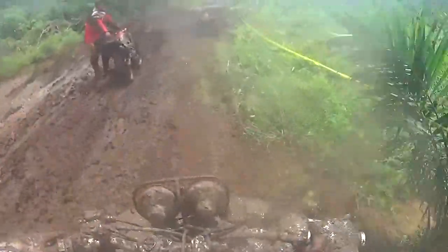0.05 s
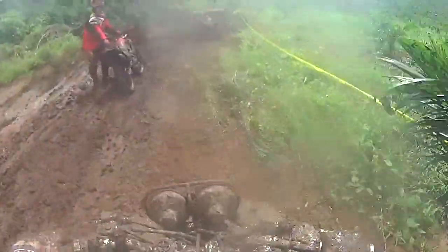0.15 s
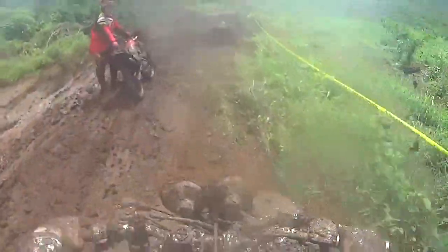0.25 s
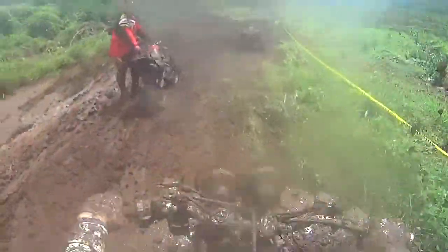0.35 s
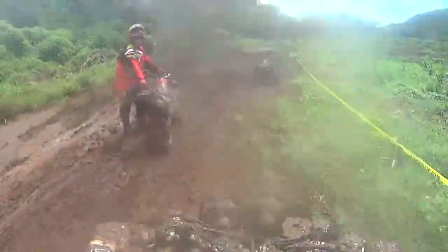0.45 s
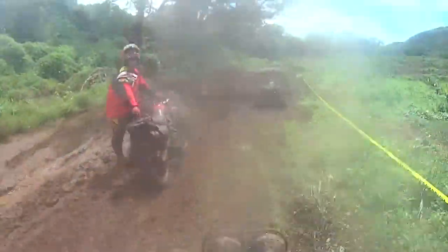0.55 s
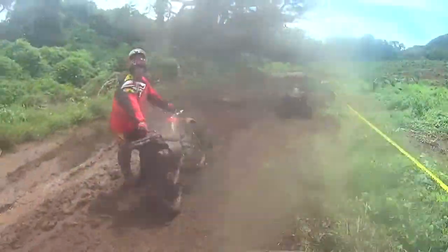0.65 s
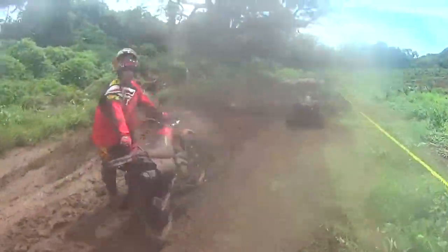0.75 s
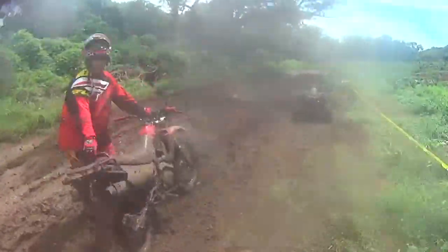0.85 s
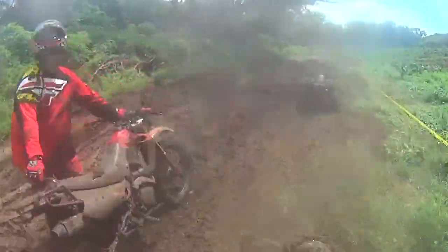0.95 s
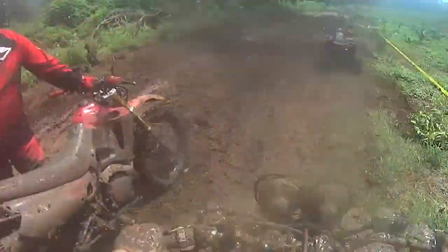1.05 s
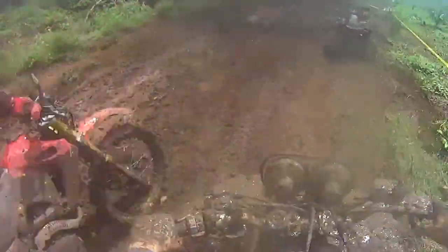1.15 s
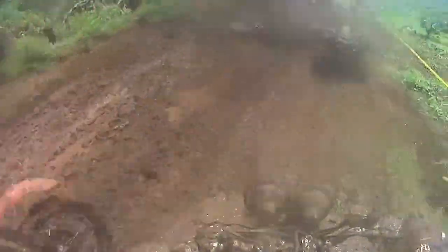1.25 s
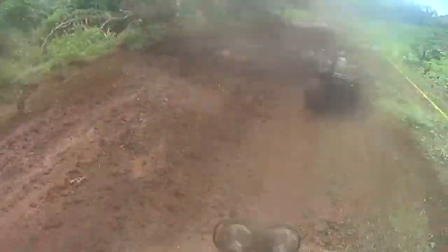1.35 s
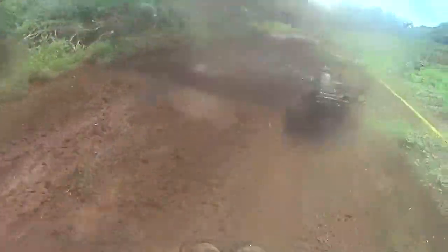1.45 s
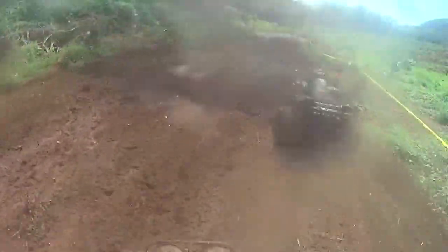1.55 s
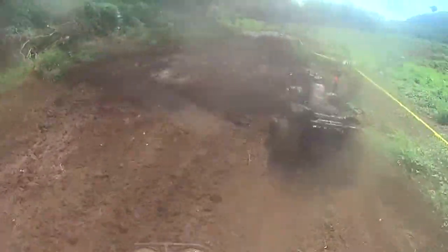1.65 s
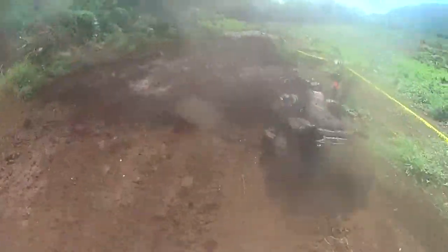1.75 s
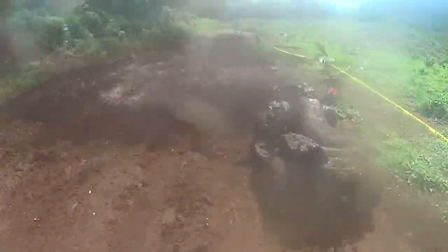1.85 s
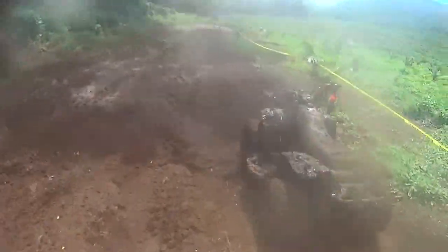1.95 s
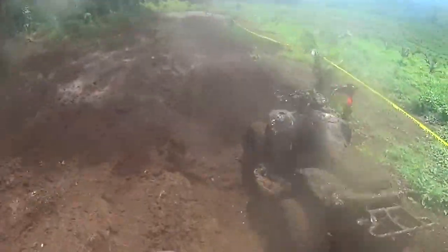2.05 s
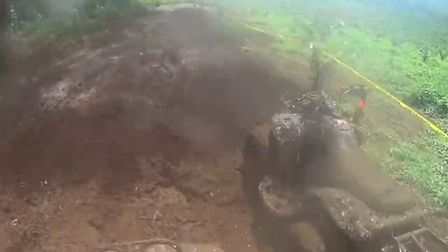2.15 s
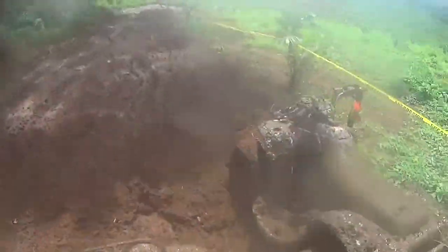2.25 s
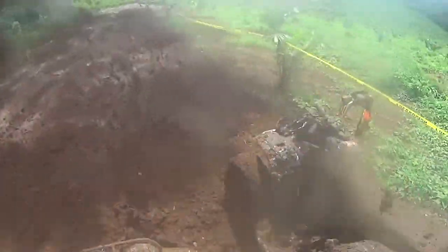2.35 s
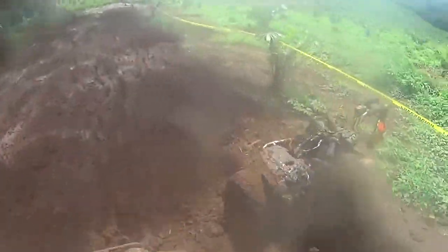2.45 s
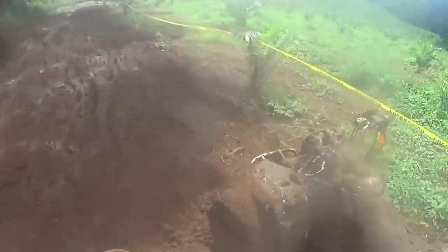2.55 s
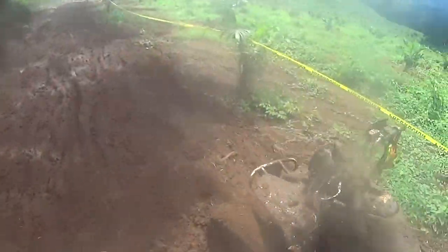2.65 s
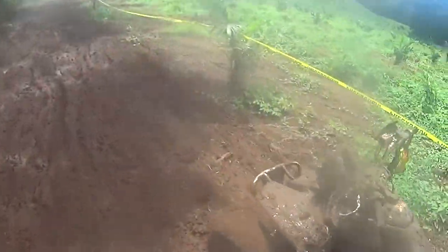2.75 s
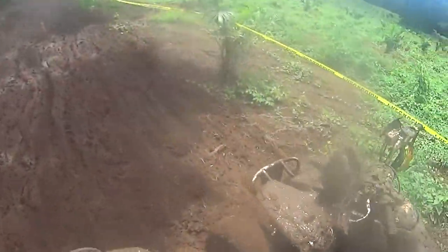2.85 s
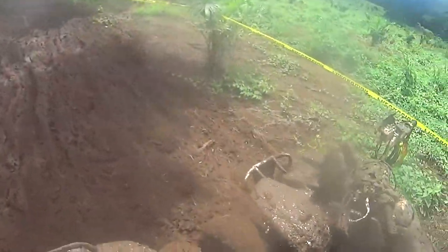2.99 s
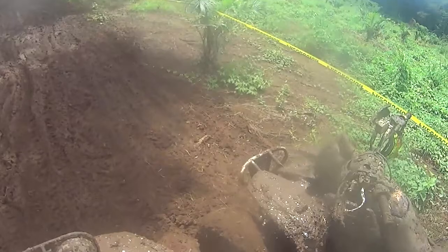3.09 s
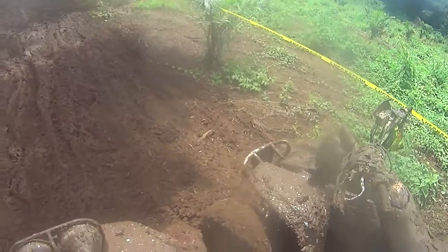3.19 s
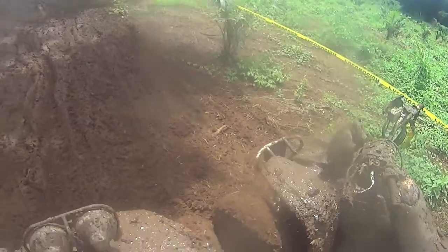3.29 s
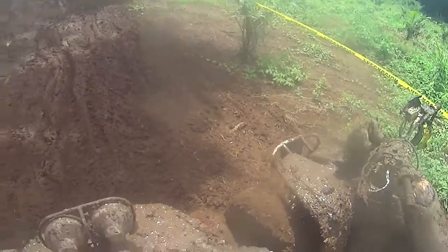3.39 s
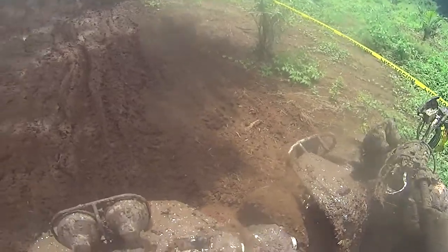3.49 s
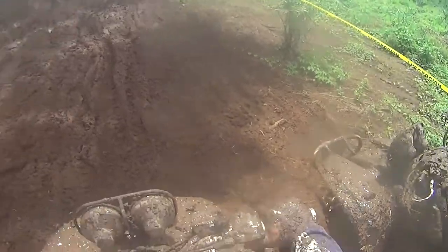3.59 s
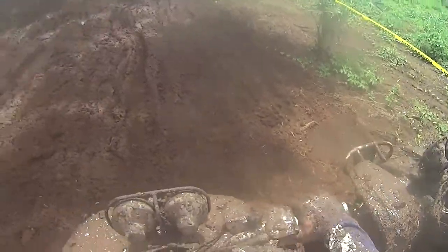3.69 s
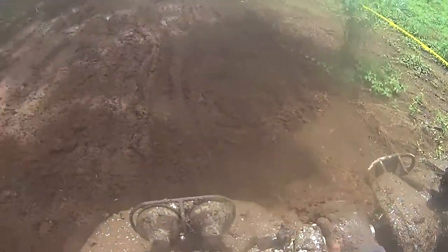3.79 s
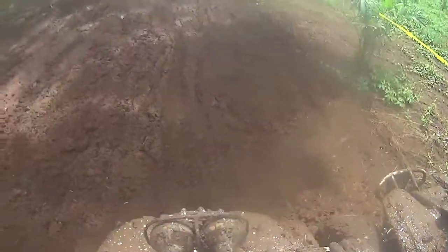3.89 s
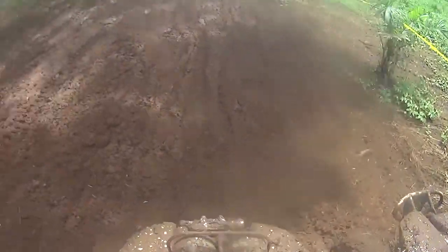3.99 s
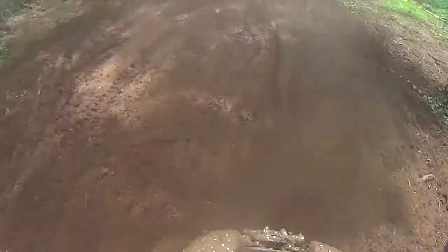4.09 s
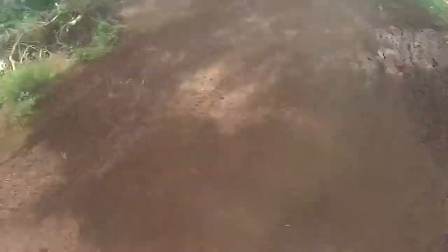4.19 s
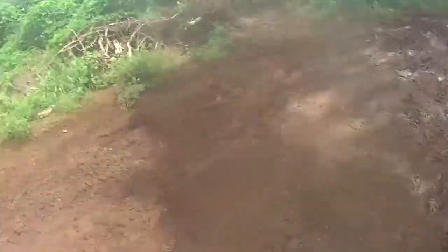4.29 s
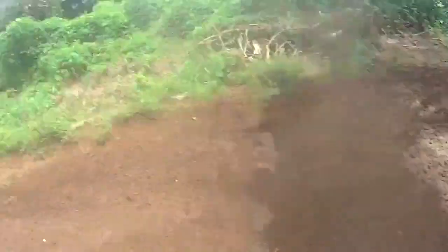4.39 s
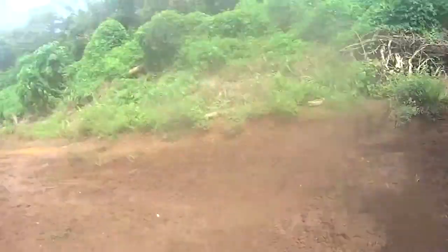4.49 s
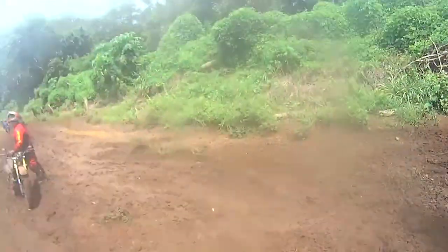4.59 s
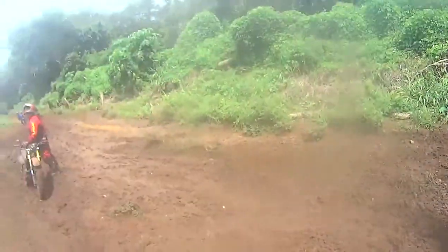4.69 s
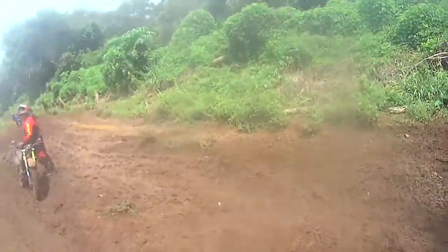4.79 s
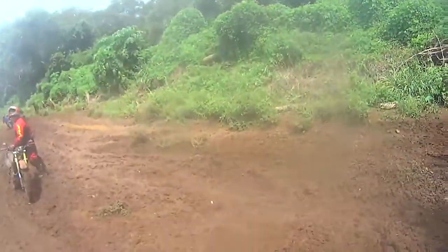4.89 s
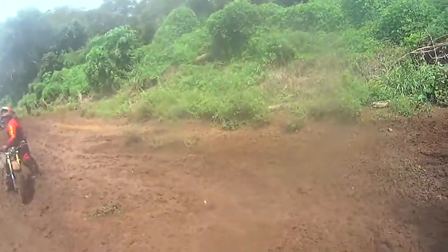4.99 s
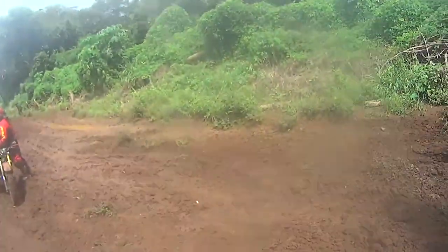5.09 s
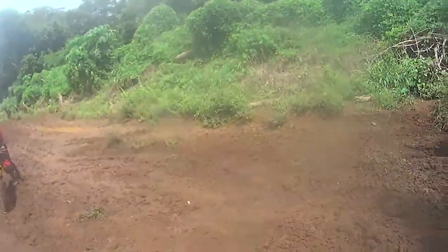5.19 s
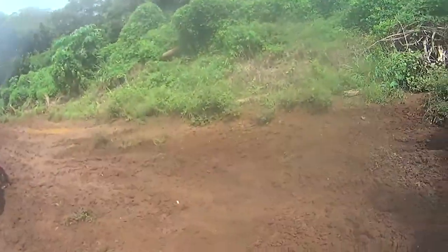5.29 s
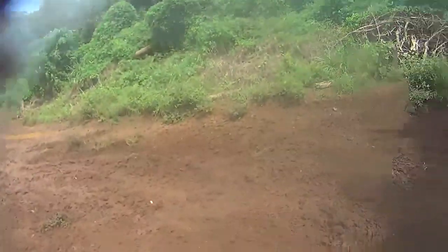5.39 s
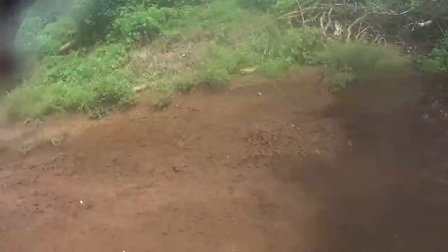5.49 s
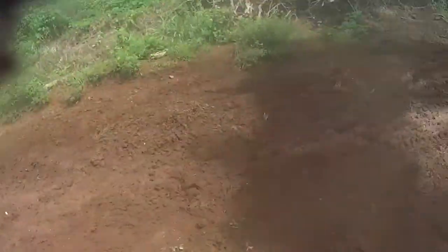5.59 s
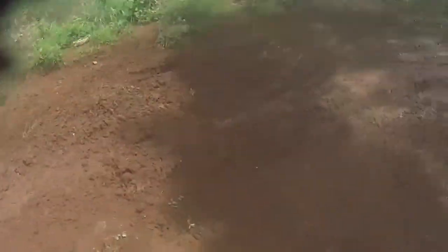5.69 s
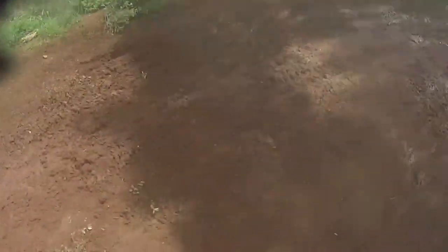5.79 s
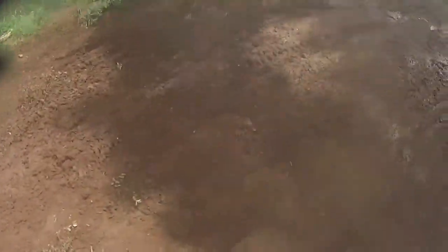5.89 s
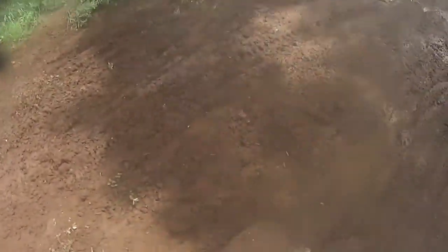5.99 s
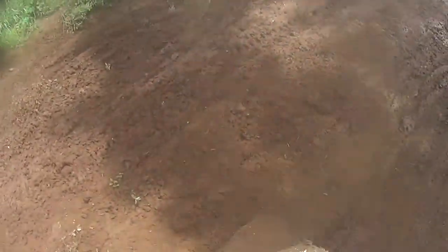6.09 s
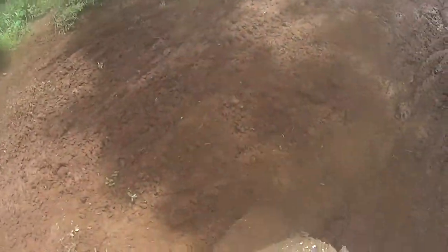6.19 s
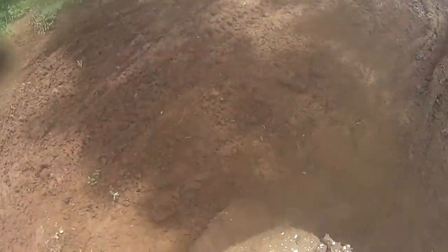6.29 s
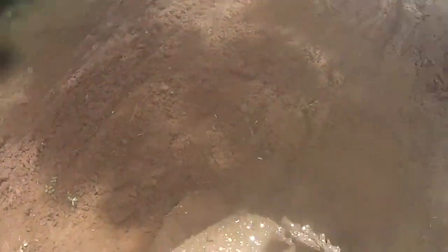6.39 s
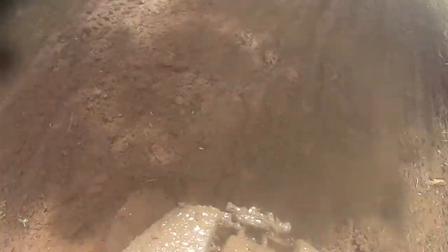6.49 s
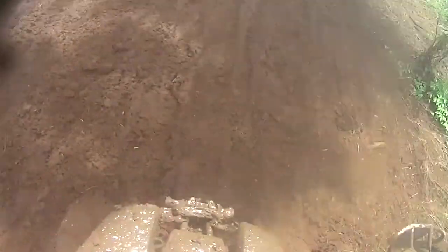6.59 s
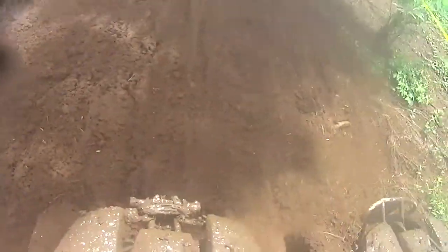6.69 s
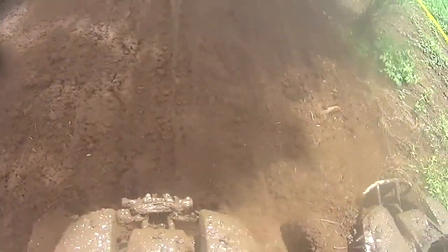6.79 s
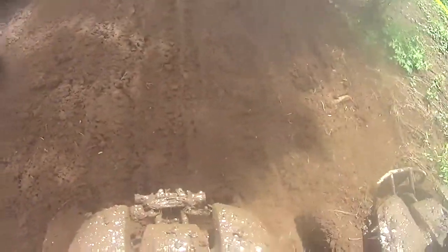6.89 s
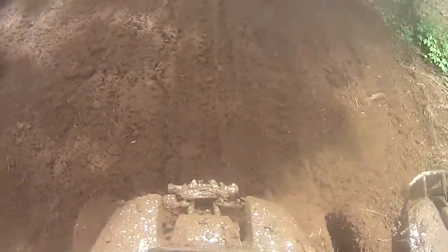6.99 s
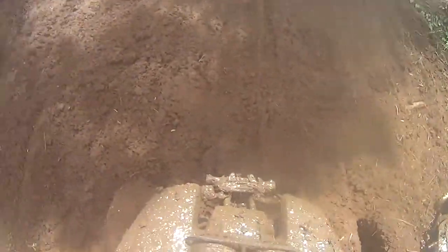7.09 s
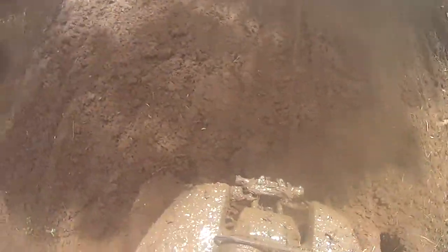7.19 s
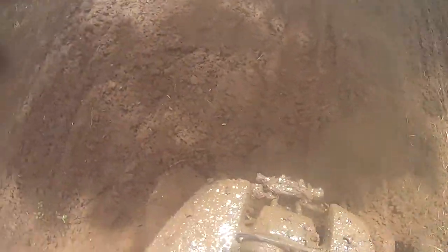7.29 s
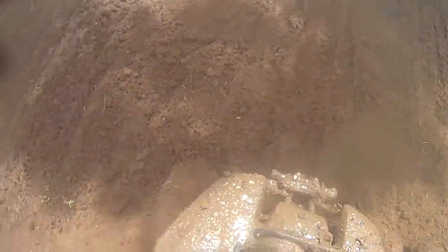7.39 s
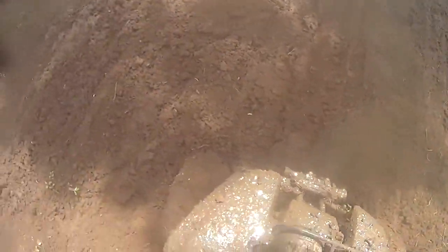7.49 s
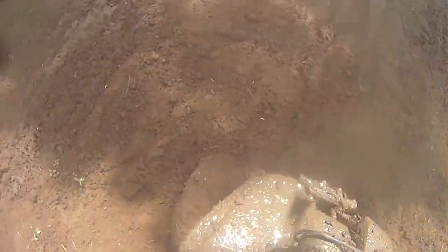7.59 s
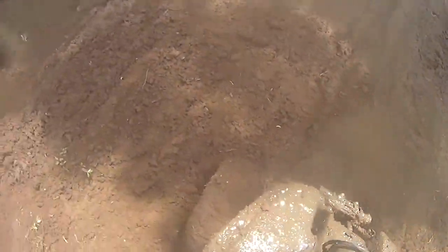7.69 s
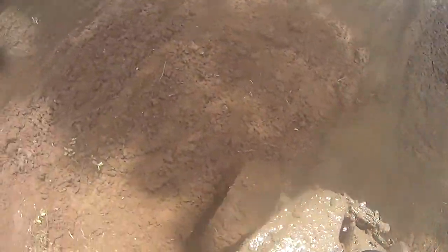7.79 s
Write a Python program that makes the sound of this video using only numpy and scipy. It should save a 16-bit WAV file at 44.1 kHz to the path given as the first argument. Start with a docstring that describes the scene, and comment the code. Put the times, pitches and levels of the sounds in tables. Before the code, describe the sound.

Close onboard single-cylinder quad engine: rough, blipping roar falling away into slow, hollow chugs and mechanical clatter, with bumps, before the engine dies.

```python
"""A single-cylinder four-stroke quad pulls hard up a muddy trail, heard from a camera in a plastic case on the rider.
Firing pulses boom, bark through pipe resonances and ring the case; air pulses and turbulence take over off throttle.
The throttle shuts, the speed runs down to a chugging idle, and the engine finally dies.
Whistle, chain, whine and panel are breathy tones or narrow noise; bumps ring the camera mount, mud clicks on the case.
A quiet bed of filtered outdoor noise and hiss lies underneath."""
import sys
import numpy as np
from scipy import signal
from scipy.fft import rfft, irfft
from scipy.io import wavfile
from scipy.ndimage import uniform_filter1d, minimum_filter1d

SR = 44100
rng = np.random.default_rng(int(sys.argv[2]) if len(sys.argv) > 2 else 0)


def wrap_up_sound(samples):
    """Save the sound to the file named by the first command line argument, as 16-bit audio."""
    columns = np.atleast_2d(samples).T
    # keep every value between -1 and 1, then stretch to whole-number steps
    tamed = np.clip(columns, -1, 1)
    steps = np.round(tamed * 32767).astype(np.int16)
    wavfile.write(sys.argv[1], SR, steps)


N = 346185
T = np.arange(N) / SR  # time in s

# idle firing once it catches: t/s, strength (0-1), extra pipe level/dB
IDLE_BURN = [(2.45, 0.19, -3.5), (3.15, 0.88, 3), (3.9, 0.79, 5), (4.5, 0.76, 1), (5.8, 0.84, -2.2),
             (7.3, 0.93, -7)]
# rider's head turning from and to the engine: t/s, level/dB before each layer takes its share
HEAD_TURN = [(0, 0.5), (2.2, 0), (3.1, -0.9), (3.8, 1.16), (4.4, -1), (5, -2.5), (5.9, 0), (6.9, 1),
             (7.85, -0.5)]
# layer mix laws: coasting level at idle speed/dB, rise per doubling of speed/dB,
# boost by idle firing/dB, by a cracked throttle/dB, by a full stab/dB, share of the head turn (factor)
BOOM_LAW = (-44.5, 1.85, 3, 3.5, -4, -0.1)
AIRBOX_LAW = (-51, 3.5, 14, 6.5, 4, 0.8)
PIPE_LAW = (-56.5, 8, 4, 3, 12.5, 0.6)
CASE_LAW = (-40.5, 6.5, -0.5, 7, 6.5, 1)
HISS_LAW = (-57, 7.5, 0.5, 4, 5, 1.1)
LET_GO_S, LET_GO_FADE_S = 1.264, 0.2  # the throttle stays cracked open until it is let go
BURN_OUT_S = 0.053  # fade of the idle firing at the stall
IDLE_UNEVEN_DB = 1.34  # spread of the chugs at full idle firing


def engine():
    """Under load each firing barks; off throttle the pumping of the cylinder and the valve gear are left."""
    rate_hz = firing_rate()
    stab, _, intake_db = thumb()
    cracked = 1 - ramp(LET_GO_S - LET_GO_FADE_S / 2, LET_GO_FADE_S)
    throttle = 0.34 * cracked + 0.56 * stab
    load = np.clip(1.84 * throttle - 0.5, 0, 1)
    burn, bark_db = np.array(curves(IDLE_BURN)) * (1 - ramp(STALL_S, BURN_OUT_S))
    uneven_db = IDLE_UNEVEN_DB * burn * murmur(IDLE_HZ)

    # the same controls ride the level of every layer
    doublings = np.log2(rate_hz / IDLE_HZ)
    controls = np.array([np.ones(N), doublings, burn, cracked, stab, curves(HEAD_TURN)[0]])
    laws = np.array([BOOM_LAW, AIRBOX_LAW, PIPE_LAW, CASE_LAW, HISS_LAW])
    boom_db, airbox_db, pipe_db, case_db, hiss_db = laws @ controls

    turn = np.cumsum(rate_hz) / SR + 0.5  # engine cycles so far
    strength = 0.25 + load  # a shut throttle leaves only weak firings
    firing = pulses(turn, 0.02, scatter_db=1, jitter_s=0.00007) * strength
    suck, slam = valve_strokes(turn)
    tappets = tappet_ticks(turn)
    # overrun air flow is turbulent; it calms as the speed sinks
    rough = np.clip((rate_hz - 15) / 30, 0.11, 0.35) * (1 - 0.85 * load)

    layers = [
        (low_boom(suck, firing, load, rough), boom_db),
        (airbox(slam, firing, load, rough), airbox_db + intake_db + uneven_db),
        (exhaust_pipe(turn, firing, throttle), pipe_db + bark_db + uneven_db),
        (case_rattle(turn, strength, tappets, throttle), case_db),
    ]
    body = sum(steady(layer) * undb(db) for layer, db in layers)
    return ports(body) + undb(hiss_db) * gas_hiss(tappets, firing, throttle)


# engine speed on the climb: t/s, f/Hz (firings per second)
CLIMB = [(0, 75), (.3, 64.1), (.4, 60.1), (.52, 52.25), (.65, 57), (.72, 55.8), (.8, 60.8), (.9, 53.6),
         (1.02, 54.6), (1.1, 47.5), (1.2, 42), (1.35, 38.5), (1.466, 39.307)]
# then the flywheel runs down to idle; a shape over 1 makes it hang a little at first
IDLE_HZ, RUN_DOWN_S, RUN_DOWN_SHAPE = 15.79, 1.3526, 1.2321
HUNT_FROM_S, HUNT_HZ, HUNT_PERIOD_S = 3.38, 0.19, 1.48  # slow swing of the speed near idle
STALL_S, STALL_HZ_PER_S = 7.38, 21  # the firing stops and friction brakes the crank


def firing_rate():
    """Cycles per second: the climb, the flywheel's run-down to a hunting idle, the friction-braked stall."""
    running_down = np.maximum(T - CLIMB[-1][0], 0) / RUN_DOWN_S
    hz = IDLE_HZ + (curves(CLIMB)[0] - IDLE_HZ) * np.exp(-running_down ** RUN_DOWN_SHAPE)
    hunt = HUNT_HZ * np.cos(2 * np.pi * (T - HUNT_FROM_S) / HUNT_PERIOD_S) * (T > HUNT_FROM_S)
    return hz - hunt - STALL_HZ_PER_S * np.maximum(T - STALL_S, 0)


# throttle stabs: opens t/s, closes t/s, stab at first (0-1), stab at last (0-1), airbox level/dB
STABS = [(0, .08, 0.7, 0.54, -2), (0.135, 0.272, 0.66, 0.67, -6), (0.287, 0.343, 0.64, .76, 2),
         (0.352, 0.466, 0.9, 0.96, 1.5), (0.523, 0.753, 0.88, 0.79, 0), (0.756, 0.862, .95, 0.93, 2.5),
         (0.942, 1.054, 0.6, 0.78, 0)]
THUMB_S = 0.016  # time to open or close
GASP_PEAK_S, GASP_AIRBOX_DB = 0.077, 6.5  # delay after closing, airbox lift at a full gasp


def thumb():
    """Stabs of the throttle, the intake's gasp against the closing plate, and the extra airbox level in dB."""
    stab, gasp, airbox_db = np.zeros((3, N))
    for opens_s, closes_s, first, last, db in STABS:
        held = ramp(opens_s - THUMB_S / 2, THUMB_S) - ramp(closes_s - THUMB_S / 2, THUMB_S)
        stab += held * np.interp(T, [opens_s, closes_s], [first, last])
        airbox_db += held * db
        age = np.maximum(T - closes_s, 0) / GASP_PEAK_S
        earlier = gasp * (1 - ramp(opens_s, THUMB_S))  # a new stab cuts the old gasp
        gasp = earlier + (age * np.exp(1 - age)) ** 2
    return stab, gasp, airbox_db + GASP_AIRBOX_DB * gasp


# air pulses of one cycle: position (share of the cycle), strength into boom (signed), into airbox (signed)
STROKES = [(-.075, -0.83, -0.52), (.06, -0.13, 0.46), (.18, 0.24, 0.46), (.31, -0.32, -0.038)]


def valve_strokes(turn):
    """Valves opening and shutting push air pulses, nearly alike in every cycle, into boom and airbox."""
    suck, slam = np.zeros((2, N))
    for share, low, box in STROKES:
        stroke = pulses(turn, share, scatter_db=1.2, jitter_s=0.00008)
        suck += stroke * low
        slam += stroke * box
    return suck, slam


def tappet_ticks(turn):
    """Tappets tick twice a cycle, the second time more softly."""
    first = pulses(turn, 0.22, scatter_db=2.5, jitter_s=0.001)
    second = pulses(turn, 0.62, scatter_db=3, jitter_s=0.002)
    return first + 0.3 * second


# low resonances: f/Hz, width/Hz, relative level/dB
BOOM = [(67.3, 11.8, 7.5), (109, 300, -4)]


def low_boom(suck, firing, load, rough):
    """Valve strokes, or firings under load, excite the low resonances along with turbulent air."""
    return blend(ring(blend(suck, firing, load), BOOM), ring(noise(), BOOM), rough)


# airbox resonances: f/Hz, width/Hz, relative level/dB
AIRBOX = [(251, 44, 4), (306, 38.3, 7), (333.2, 34.8, 3)]
# muffler resonances: f/Hz, width/Hz, relative level/dB
MUFFLER = [(245, 53, 3.1), (293, 106, 3.3), (320.3, 29, 7.5)]


def airbox(slam, firing, load, rough):
    """Valve strokes ring the airbox; under load the firings ring the muffler instead; turbulence joins in."""
    ringing = blend(ring(slam, AIRBOX), ring(firing, MUFFLER), load)
    return blend(ringing, ring(noise(), AIRBOX), rough)


# pipe resonances on the throttle: f/Hz, width/Hz, relative level/dB
PIPE = [(539, 65, 3), (657, 31, 1.5), (802, 57, 4.5), (890, 79, -4.5)]
# pipe resonances at idle: f/Hz, width/Hz, relative level/dB
IDLE_PIPE = [(476, 186, -5), (540.6, 41, 7.5), (819, 17, -7), (876, 67, -33)]


def exhaust_pipe(turn, firing, throttle):
    """Idle puffs and their turbulence ring the pipe; on the throttle the firings ring it at other pitches."""
    puff = pulses(turn, 0.1193, scatter_db=3, jitter_s=0.0001)
    breathy_puff = blend(puff, gush(puff, 0.008), 0.5)
    idle = ring(blend(breathy_puff, noise(), 0.22), IDLE_PIPE)
    loud = blend(ring(firing, PIPE), ring(gush(firing, 0.008), PIPE), 0.06)
    return blend(idle, loud, 1.4 * throttle)


# case tone on the throttle: f/Hz, relative level/dB
CASE_LOUD = [(560, -36), (950, -34), (991, -32), (1280, -1.5), (1370, -4.5), (1520, 5), (1660, 11),
             (1780, 3), (2030, -13.5), (2170, -47), (2600, -35), (3380, -106), (5720, -120)]
# case tone off the throttle: f/Hz, relative level/dB
CASE_SOFT = [(410, -43.5), (700, -17.5), (816, -11), (926, -13), (989, -24), (1080, -14), (1190, -13),
             (1290, -2.5), (1450, -0.5), (1580, 3.5), (1680, 1), (1910, -14.5), (2430, -30), (2600, -29),
             (3380, -94.5), (5720, -120)]


def case_rattle(turn, strength, tappets, throttle):
    """Valve-gear clatter colours the plastic case; on the throttle the sharp blast fronts ring it."""
    # tappets over the rustle of chain and gears
    clatter = blend(noise(), gush(tappets, 0.011), 0.4)
    # the front of each blast wanders a little, so its high partials smear
    crack = pulses(turn, 0.02, scatter_db=1, jitter_s=0.0002) * strength
    bark = blend(crack, gush(crack, 0.005), 0.3)
    return blend(colour(clatter, CASE_SOFT), colour(bark, CASE_LOUD), 1.036 * throttle)


# hiss tone on the throttle: f/Hz, relative level/dB
HISS_LOUD = [(1290, -3), (2200, 4), (2780, 0.5), (3360, 4), (3670, -8), (3900, -9), (4460, -5.5),
             (4970, -19), (5460, -10), (6730, -15), (7650, -28), (10200, -32), (11000, -43), (14300, -75),
             (22000, -120)]
# hiss tone off the throttle: f/Hz, relative level/dB
HISS_SOFT = [(1300, -40.5), (2200, 2), (2500, -5), (3200, 4), (3600, -2), (3800, -8), (4150, -3.5),
             (4450, -6), (5000, 0.5), (5800, -7), (6600, -17), (7350, -8.5), (8100, -15), (9000, -13),
             (10000, -23.5), (11000, -35.5)]
# width of the hiss: f/Hz, side minus mid level/dB
HISS_WIDTH = [(1500, -3), (2700, 6), (3300, -4), (4000, 4), (5000, -11), (5800, 0.5), (7400, -0.5),
              (11000, 0)]


def gas_hiss(tappets, firing, throttle):
    """Gas and chain turbulence flares at tappets or firings and reaches each port differently."""
    def draw():
        soft = blend(noise(), gush(tappets, 0.0036), 0.21)
        loud = blend(noise(), gush(firing, 0.0047), 0.49)
        return blend(colour(soft, HISS_SOFT), colour(loud, HISS_LOUD), throttle)

    mid, side = draw(), draw()
    return mid + colour(side, HISS_WIDTH) * np.array([[1], [-1]])


def throttle_whistle():
    """Air whistles past the closing throttle plate with each gasp."""
    _, gasp, _ = thumb()
    return gasp * tone(4890, -39.5, width_hz=190)


CHAIN_HZ, CHAIN_DB, CHAIN_DB_PER_DOUBLING = 4955, -61.5, 7  # level at idle speed and its rise
CHAIN_FACING = 5.8  # share of the head turn


def chain_ring():
    """The timing chain rings louder with speed, and mostly when the head faces the engine."""
    speed_db = CHAIN_DB_PER_DOUBLING * np.log2(firing_rate() / IDLE_HZ)
    db = CHAIN_DB + speed_db + CHAIN_FACING * curves(HEAD_TURN)[0]
    return tone(CHAIN_HZ, db, width_hz=320)


# faint whine while coasting: t/s, f/Hz, level/dB
WHINE = [(4.25, 1105, -49), (4.598, 1106, -53.5), (5, 1070, -56), (5.298, 1098, -58.5), (5.698, 1116, -49)]


def coasting_whine():
    """A thin breathy tone drifts in pitch and level, fading in and out at its ends."""
    fade = np.clip(np.minimum(T - WHINE[0][0], WHINE[-1][0] - T) * 10, 0, 1)
    return fade * tone(*curves(WHINE), width_hz=42)


SING_HZ, SING_WIDTH_HZ, SING_DB = 1563, 81, -39
SING_FULL_S, SING_RISE_DB_PER_S, SING_FALL_DB_PER_S = 6.55, 7, 28


def panel_sing():
    """A panel resonance in noise builds up at idle, holds, and fades as the engine dies."""
    rise_db = SING_RISE_DB_PER_S * np.maximum(SING_FULL_S - T, 0)
    fall_db = SING_FALL_DB_PER_S * np.maximum(T - STALL_S, 0)
    once = band(noise(), SING_HZ, SING_WIDTH_HZ)
    return steady(band(once, SING_HZ, SING_WIDTH_HZ)) * undb(SING_DB - rise_db - fall_db)


# trail bumps on the camera mount: t/s, level/dB, pitch (factor), contact time/s
BUMPS = [(1.591, -16, 0.87, 0.0018), (1.599, -11, 1.07, 0.0024), (1.616, -25, 1.01, 0.0012),
         (1.999, -21.5, 0.99, 0.0024), (2.715, -37, 0.67, 0.0053), (2.816, -21.5, 0.97, 0.0081),
         (4.757, -30.5, 0.93, 0.0043), (6.627, -19.5, 1.036, 0.0014), (6.632, -22.5, 0.74, 0.0037),
         (6.643, -21, 1.1, 0.0015), (6.66, -19, 0.96, 0.0034)]
# mount ring modes: f/Hz before the pitch factor, relative level/dB, t60/s
MOUNT = [(62.4, -14, 0.08), (115.5, 2.5, 0.26), (246.5, 3, 0.11), (295, -7.5, 0.15), (490, -6.5, 0.14)]
ROCK_DB, ROCK_LAG_S = -10.5, 0.0022  # sideways rocking, a little later


def bumps():
    """Soft blows set the decaying modes of the camera mount ringing and rock it sideways."""
    out, t = np.zeros(N), T[:SR // 2]
    for s, db, pitch, contact_s in BUMPS:
        modes = np.zeros(len(t))
        for hz, mode_db, t60 in MOUNT:
            modes += undb(mode_db) * np.cos(2 * np.pi * hz * pitch * t) * undb(-60 * t / t60)
        push = np.hanning(int(contact_s * SR) + 3)  # longer contact, duller thud
        thud = np.convolve(modes, push / push.sum())[:len(t)]
        i = int(s * SR)
        out[i:i + len(t)] -= undb(db) * thud
    rock = undb(ROCK_DB) * np.interp(T - ROCK_LAG_S, T, out, left=0)
    return ports(out) + rock * np.array([[1], [-1]])


# mud clicks on the case: t/s, level/dB, centre f/Hz, treble level/dB relative to the note, decay/s
CLICKS = [(.126, -16, 1630, -6.5, 0.0016), (.269, -18.5, 1550, -5, 0.00064),
          (0.5564, -4, 1531, -5.5, 0.00088), (1.164, -12.5, 795, -33, 0.0019),
          (1.585, -15.5, 1390, -23, 0.0052), (1.593, -12.5, 890, -22, 0.001),
          (1.597, -14, 1440, -30, 0.0051), (1.601, -12, 640, -15, 0.0025), (1.604, -9, 1420, -12.5, 0.0023),
          (1.61, -19, 1380, -28, 0.0022), (1.868, -8, 1550, -25, 0.0027), (2.077, -24.5, 692, -14, 0.0058),
          (2.24, -12.5, 1700, -20, 0.0027), (4.756, -15, 1530, -40, 0.0037),
          (4.757, -12.5, 910, -40, 0.0026), (4.758, -29, 347, -30, 0.03), (4.774, -22.5, 960, -26, 0.0037),
          (4.95, -31.5, 1002, -26, 0.006), (6.628, -21, 1310, -38, 0.0005), (6.644, -23, 840, -26, 0.0067)]


def clicks():
    """Bits of mud give short gritty hits on the plastic, each with its own note and a bright crack."""
    out, t = np.zeros(N), T[:SR // 10]
    for s, db, hz, treble_db, decay_s in CLICKS:
        grit = rng.standard_normal(len(t)) * np.exp(-t / decay_s)
        note = band(band(grit, hz, hz * 0.4), hz, hz * 0.6)
        # harder contact, higher crack
        crack_hz = 2900 * 2 ** (np.clip(treble_db + 18, -14, 18) / 18)
        crack = band(band(grit, crack_hz, crack_hz * 0.36), crack_hz, crack_hz)
        hit = note / np.abs(note).max() + undb(treble_db) * crack / np.abs(crack).max()
        i = int(s * SR)
        out[i:i + len(t)] += undb(db) * hit
    return ports(out, lag_s=0.000384)


# tone of the outdoor bed: f/Hz, relative level/dB
TRAIL = [(25, -36.5), (80, -12.5), (270, 10.5), (400, 7.5), (700, -18.5), (1000, -44), (1550, -43),
         (2300, -24.5), (5000, -16.5), (11000, -27)]
TRAIL_DB, HISS_DB = -51, -58


def trail():
    """A quiet bed: coloured outdoor noise with a softer side part, and white hiss at each port."""
    mid, side = (steady(colour(noise(), TRAIL)) for _ in range(2))
    outdoors = mid + 0.5 * side * np.array([[1], [-1]])
    return undb(TRAIL_DB) * outdoors + undb(HISS_DB) * np.array([noise(), noise()])


# width of the sound at the two ports: f/Hz, side minus mid level/dB
WIDTH = [(60, -13), (120, -26.5), (190, -20), (265, -4), (340, -2.5), (520, 3), (820, -8), (1020, 5),
         (1280, -5), (1600, -16), (2100, -10.5), (3300, 1.5), (5000, -15), (11000, 2)]


def ports(mid, lag_s=0.003207):
    """The case walls carry a later copy to the two ports in opposite senses."""
    side = np.interp(T - lag_s, T, colour(mid, WIDTH), left=0)
    return np.array([mid + side, mid - side])


def pulses(turn, share, scatter_db, jitter_s):
    """One pulse a cycle at the given share of it, each with its own size and a little timing error."""
    cycles = np.arange(int(turn[-1]) - 1) + 1 + share
    chance = rng.standard_normal((len(cycles), 2))
    at = np.clip((np.interp(cycles, turn, T) + jitter_s * chance[:, 0]) * SR, 0, N - 2)
    size = undb(scatter_db * chance[:, 1])
    # split each pulse between the two nearest samples
    i = at.astype(int)
    return np.bincount(i, size * (1 - at + i), N) + np.bincount(i + 1, size * (at - i), N)


def gush(hits, decay_s):
    """Turbulence that flares at each pulse and dies away."""
    return noise() * signal.lfilter([1], [1, -np.exp(-1 / (decay_s * SR))], hits)


def ring(x, modes):
    """A set of resonances, alternating in sign, with steep outer skirts."""
    y = np.zeros(N)
    for k, (hz, width_hz, db) in enumerate(modes):
        y += (-1) ** k * undb(db) * band(x, hz, width_hz)
    edges_hz = [modes[0][0] * 0.81, modes[-1][0] * 1.69]
    return signal.sosfilt(signal.butter(2, edges_hz, "band", fs=SR, output="sos"), y)


def band(x, hz, width_hz):
    """One resonance, gain 1 at its centre."""
    return signal.lfilter(*signal.iirpeak(hz, hz / width_hz, fs=SR), x + 1e-18)


def colour(x, points):
    """Causal minimum-phase filter through (Hz, dB) points, built by folding the cepstrum."""
    size = 4096
    hz, db = np.transpose(points)
    bins_hz = np.arange(size // 2 + 1) * SR / size
    gain = undb(np.interp(np.log(bins_hz + 1), np.log(hz), db))
    cepstrum = irfft(np.log(gain))[:size // 2]
    cepstrum[1:] *= 2
    impulse = irfft(np.exp(rfft(cepstrum, size)))
    return signal.fftconvolve(x, impulse)[:len(x)]


def blend(a, b, share):
    """Mix two sounds by power; share is that of the second."""
    share = np.clip(share, 0, 1)
    return np.sqrt(1 - share) * steady(a) + np.sqrt(share) * steady(b)


def steady(x):
    """Unit level over a sliding stretch; the shape of each cycle stays."""
    size = SR // 8
    power = uniform_filter1d(uniform_filter1d(x * x, size), size)
    return x / np.sqrt(np.abs(power) + 1e-18)


def tone(hz, db, width_hz):
    """A breathy tone: random amplitudes on sine and cosine; pitch and level may move."""
    angle = 2 * np.pi * np.cumsum(hz * np.ones(N)) / SR
    return (murmur(width_hz) * np.sin(angle) + murmur(width_hz) * np.cos(angle)) * undb(db)


def murmur(width_hz):
    """A slow random amplitude that spreads a tone to the given width."""
    return steady(signal.sosfilt(signal.butter(2, width_hz / 2, fs=SR, output="sos"), noise()))


def noise():
    """White noise of unit level."""
    return rng.standard_normal(N)


def ramp(start_s, length_s):
    """Rises from 0 to 1 over the given time."""
    return np.clip((T - start_s) / length_s, 0, 1)


def curves(table):
    """The columns of a table, joined by straight lines in time."""
    s, *columns = np.transpose(table)
    return [np.interp(T, s, c) for c in columns]


def undb(db):
    """Decibels to an amplitude factor."""
    return 10 ** (np.asarray(db) / 20)


def scene():
    """Engine, tones and hits lean slightly to the first port; the outdoor bed lies under them."""
    tones = throttle_whistle() + chain_ring() + coasting_whine() + panel_sing()
    close = engine() + ports(tones) + bumps() + clicks()
    return close * undb(np.array([[0.4], [-0.4]])) + trail()


def record(dry):
    """The camera's fast limiter holds the peaks down; the top is cut."""
    size = SR // 300
    ceiling, top_hz = 0.5, 11050
    held = -minimum_filter1d(-np.abs(dry.mean(axis=0)), size)
    peak = uniform_filter1d(held, size)
    limited = dry * ceiling / np.maximum(peak, ceiling)
    return signal.sosfilt(signal.ellip(10, 0.2, 80, top_hz, fs=SR, output="sos"), limited)


dry = scene()
out = record(dry)
wrap_up_sound(out)
```